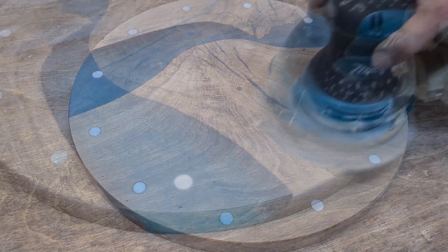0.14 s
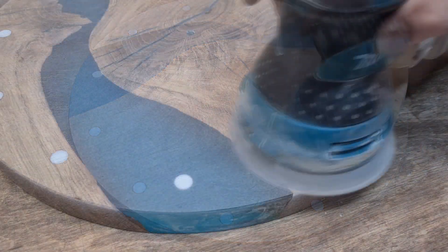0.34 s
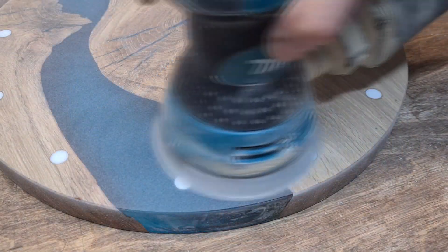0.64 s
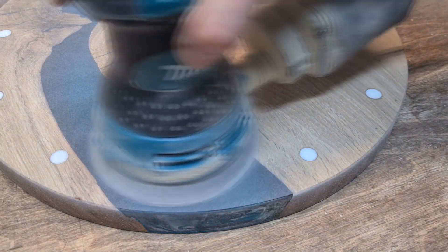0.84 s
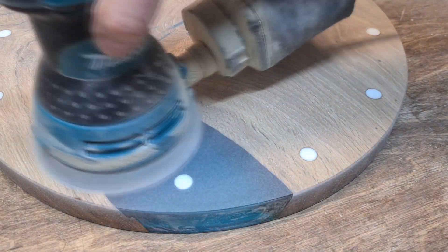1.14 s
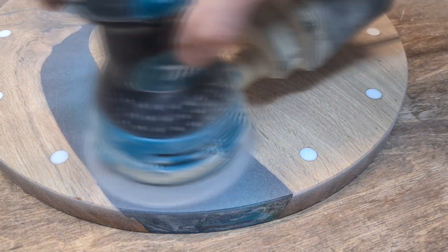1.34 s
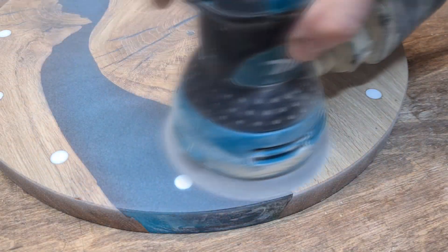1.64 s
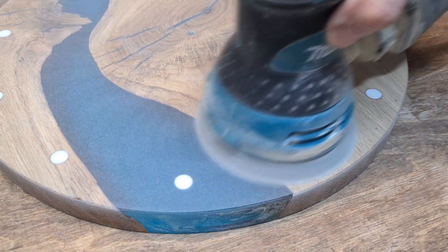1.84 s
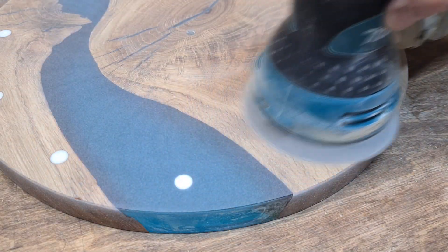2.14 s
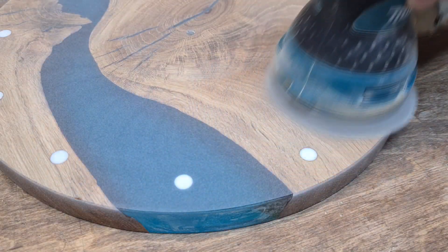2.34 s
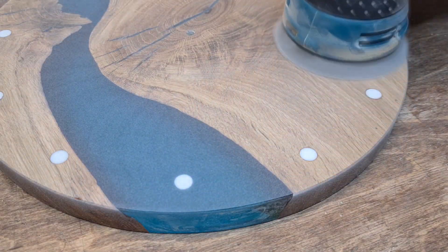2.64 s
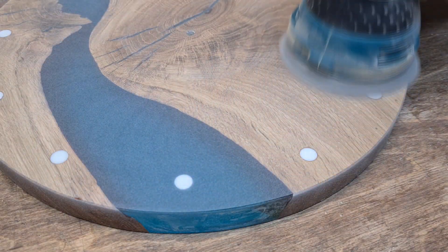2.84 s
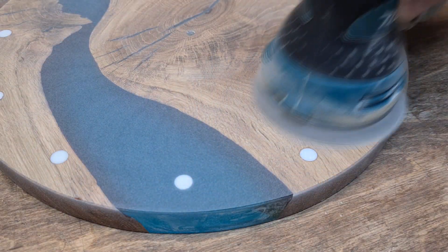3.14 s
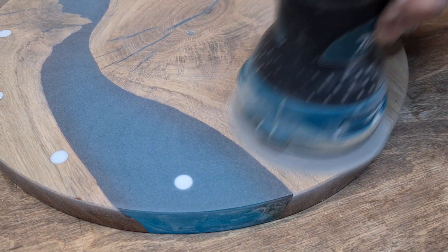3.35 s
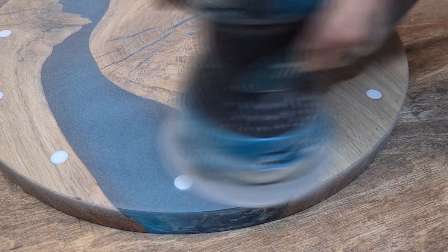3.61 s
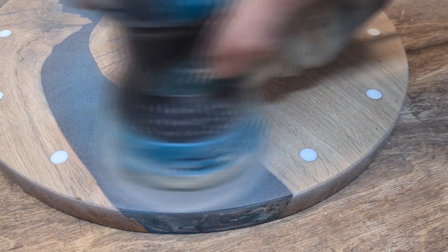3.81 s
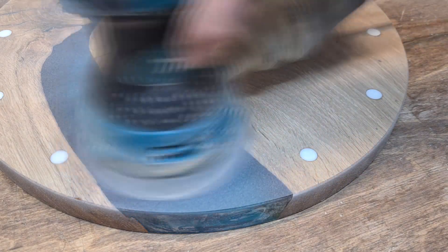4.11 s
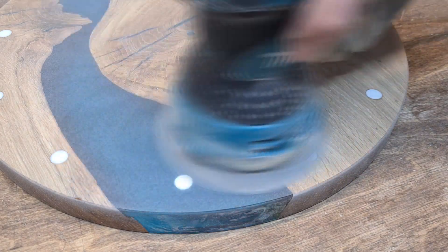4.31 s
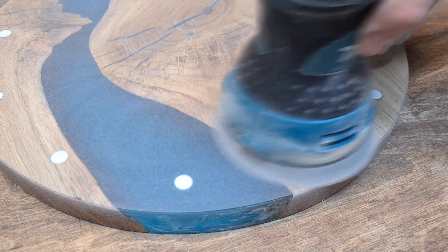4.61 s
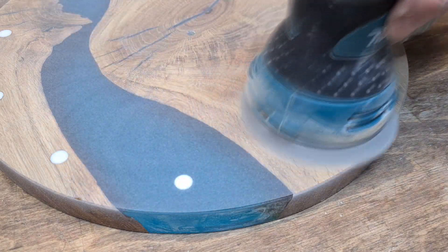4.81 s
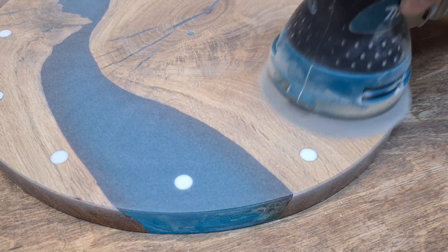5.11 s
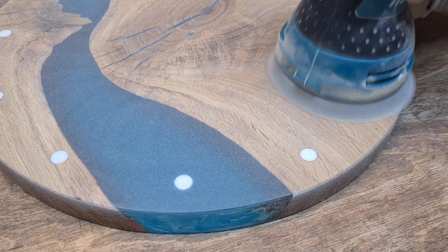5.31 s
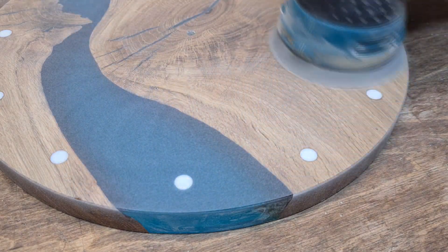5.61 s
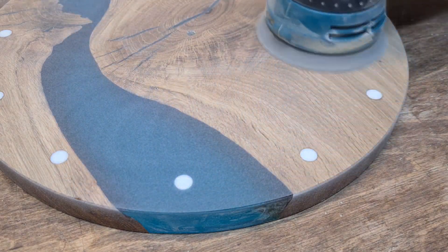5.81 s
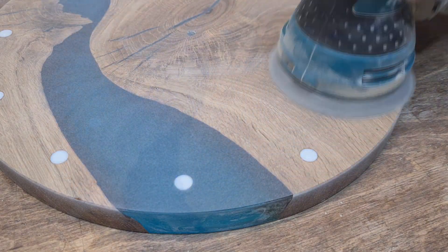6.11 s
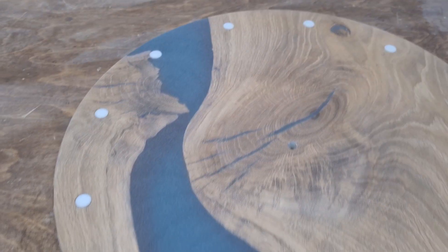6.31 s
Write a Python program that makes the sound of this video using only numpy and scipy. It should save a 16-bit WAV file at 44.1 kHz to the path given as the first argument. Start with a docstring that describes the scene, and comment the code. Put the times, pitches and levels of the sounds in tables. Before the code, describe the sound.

Already running at the start, an electric sander hums, buzzes and whines very close by, its sound leaning right. A second, slightly lower motor tone dies away in the first half second. Dry abrasive rasp and airy hiss stay constant while the whine flickers with each sweep over the board. Over the last second the tool smoothly fades to a barely audible low workshop rumble.

```python
"""A random orbital sander sweeps over a thick wood and resin board in a workshop, near a stereo microphone.
At the start a second, slower sander, a few steady tones, dies away while the near tool's tones come to full level.
Then the shaft orders sing as tones set by the tool's place, the slowly spinning pad adds lines around them,
and shaped noise makes board rumble, casing rattle, grit and air hiss while the tool moves from side to side.
At the end the tool fades out and a faint room rumble of low noise remains."""
import sys
import numpy as np
from scipy import signal
from scipy.fft import rfft, irfft, next_fast_len
from scipy.io import wavfile
from scipy.ndimage import uniform_filter1d, map_coordinates

SR = 44100
rng = np.random.default_rng(int(sys.argv[2]) if len(sys.argv) > 2 else 0)


def generate_wav(signal):
    """Clip the signal to [-1, 1] and save it as 16-bit WAV at the path in sys.argv[1]."""
    frames = np.transpose(np.atleast_2d(signal))
    scaled = np.clip(frames, -1, 1) * 32767
    pcm = np.round(scaled).astype(np.int16)
    wavfile.write(sys.argv[1], SR, pcm)


N = 284886
T = np.arange(N) / SR
COARSE = T[::128]  # time grid of slow changes, s

# shaft speed: time_s, turns_per_s
SHAFT_SPEED = [(0, 202.27), (.4, 202.42), (1.2, 202.98), (1.4, 202.62), (1.8, 201.5), (2.4, 200.26),
               (2.8, 200.76), (3.0, 200.9), (3.35, 200.88), (3.7, 201.43), (4.03, 202.35), (4.2, 202.26),
               (4.4, 201.54), (5.0, 200.35), (5.6, 198.96), (5.8, 199.61), (6.0, 199.82)]
# likeness of the two sides: freq_hz, likeness (0 to 1)
LIKENESS = [(30, .25), (90, .35), (150, 0.53), (300, 0.73), (700, 0.89), (1200, .6), (2500, 0.31),
            (5000, 0.17), (9000, 0.18), (15000, 0.15)]
# arrival difference: place (-1 to 1), left_lag_ms
LEFT_LAG = [(-1, 0.11), (-.6, .09), (-0.27, -.03), (0, -.22), (.3, -0.018), (0.56, 0.043), (0.98, 0.085)]


def amp(db):
    """Amplitude ratio of a level in dB."""
    return 10 ** (np.asarray(db) / 20)


def unit(x):
    """Scale to rms 1."""
    return x / np.sqrt(np.mean(x ** 2) + 1e-20)


def along(points, hz):
    """Interpolate (freq_hz, value) points on a log frequency axis."""
    f, v = np.transpose(points)
    return np.interp(np.log(hz + 1), np.log(f + 1), v)


def curves(rows, t=T):
    """Interpolate each column after the first at t."""
    start, *cols = np.transpose(rows)
    return np.array([np.interp(t, start, c) for c in cols])


def place(t):
    """Place on the lap: -1 far right corner, 0 near left end, 1 back in the corner."""
    # hand path: time_s, unwrapped_place (2 more each lap)
    hand_path = [(0, -.62), (.3, -.42), (.7, -.2), (1.12, 0), (1.5, .28), (1.88, .5), (2.1, .64),
                 (2.28, .73), (2.52, .86), (2.76, 1), (3.0, 1.22), (3.3, 1.4), (3.6, 1.7), (4.0, 2),
                 (4.2, 2.28), (4.5, 2.49), (4.8, 2.67), (4.95, 2.74), (5.4, 2.8), (5.62, 2.86), (5.86, 3),
                 (6.1, 3.2)]
    return (curves(hand_path, t)[0] + 1) % 2 - 1


def wobble(knots_per_s, count):
    """Smooth random curves on the coarse grid: splines through normal random knots."""
    knots = rng.standard_normal((count, 400))
    return np.array([map_coordinates(k, [COARSE * knots_per_s]) for k in knots])


def filtered(x, response):
    """Multiply the spectrum by a response of frequency."""
    m = next_fast_len(N + 8192)
    return irfft(rfft(x, m) * response(np.fft.rfftfreq(m, 1 / SR)), m)[..., :N]


def rush(spectrum, lo_hz, hi_hz, patchy_db, size=512):
    """Patchy stereo noise, mono rms 1 in lo-hi: a shared part with a side-to-side lag plus each side's own part."""
    hz, t, (shared, left, right) = signal.stft(rng.standard_normal((3, N)), SR, nperseg=size)
    field = uniform_filter1d(rng.standard_normal(left.shape), size=7, axis=0)
    field = uniform_filter1d(field, size=8192 // size, axis=1)
    alike = along(LIKENESS, hz)[:, None]
    lag_s = curves(LEFT_LAG, place(t))[0] / 1000
    late = np.exp(-2j * np.pi * np.outer(hz, lag_s))
    z = np.sqrt(alike) * np.array([shared * late, shared])
    z = z + np.sqrt(1 - alike) * np.array([left, right])
    z = z * amp(along(spectrum, hz)[:, None] + patchy_db * unit(field))
    power = np.mean(np.abs(z.mean(0)) ** 2, axis=1)
    band_power = power[(hz > lo_hz) & (hz < hi_hz)].sum()
    pair = signal.istft(z, nperseg=size)[1][:, :N]
    return pair / np.std(pair.mean(0)) * np.sqrt(power.sum() / band_power)


def strong_orders(shaft):
    """Shaft-locked tones: level and phase follow the tool's place, and each side wavers on its own."""
    # all order tables: place, left_db, right_db, left_lead_rad
    # once a turn: the off-centre weight shakes the board
    orbit = [(-1.04, -31, -22.5, -1.3), (-.87, -34.5, -26, -1.4), (-.75, -30, -23, -0.58),
             (-.6, -28, -23, -0.71), (-0.32, -22, -19, -.6), (0, -19.5, -20, -0.29),
             (.3, -23.2, -21.5, -0.63), (.5, -27.2, -23.5, -.85), (.72, -28.5, -25, -1.1),
             (0.783, -31.5, -27, -1.2), (.87, -27, -23.5, -.9), (1, -30.5, -26.5, -1.5)]
    # 2, 3 and 6 a turn
    double = [(-1.04, -25.5, -25, 0), (-0.77, -29, -30.5, 0.2), (-.6, -30.5, -34.2, 1),
              (-.4, -40.5, -36.5, 1.15), (-0.21, -43.5, -36.5, .2), (-0.045, -53.5, -37.5, -0.5),
              (0.18, -46, -38, -4), (.5, -37.5, -35.5, -4.5), (.72, -28, -32.5, -5.5),
              (0.795, -26, -27, -6.5), (.87, -28.5, -30.5, -6), (1, -24.5, -25, -6)]
    triple = [(-0.79, -41, -40, -.4), (-0.8, -52, -50, -.8), (-.4, -39.5, -44, -0.033),
              (-0.25, -41, -48, 1.2), (0, -34.5, -38.5, 1.3), (.3, -38, -43, 1.5), (.5, -45, -41.5, .5),
              (0.75, -42.5, -43, -.9), (.86, -37, -37, -.7), (1, -39, -41, -0.21)]
    sixth = [(-1, -51.5, -56.5, 0), (-0.41, -46, -46.5, .1), (-.15, -57.5, -54, .6), (0.24, -47, -41.5, .6),
             (0.14, -42, -42, .2), (.7, -43, -48.5, 0), (1, -63, -54.5, 0)]
    # 12 a turn: armature slots
    slots = [(-1, -47, -43.5, -0.8), (0.055, -48, -43, -0.8), (-0.47, -47, -47, .3),
             (-0.076, -50.5, -54, 3), (.3, -41.5, -50, 2), (.5, -46, -43.5, -1), (.75, -51, -46, -0.6),
             (1, -49, -45, -0.8)]
    # 18 a turn: fan blades
    fan = [(-1, -47, -36, 2.2), (-.75, -46, -36, 4), (-0.37, -48.5, -37.5, 3.5), (-0.21, -48, -37.5, 7),
           (-0.035, -50.5, -42.5, 3.5), (0.31, -43, -36.5, 1.7), (.5, -46, -35, 0.8), (.75, -49, -38, -4),
           (1, -43, -36, -4.5)]
    # 24 a turn: commutator bars; below is one turn under
    whine = [(-0.86, -38.5, -27.5, 3.7), (-.75, -38.5, -27.5, 3.5), (-.58, -34, -23.5, 3.84),
             (-.3, -37, -30.5, 5), (-.12, -39.5, -34.5, 4.3), (-0.021, -32.5, -36, 6.4),
             (.12, -35.5, -37.5, 9), (0.32, -41.5, -31, 6.9), (.5, -35, -27, 5.8), (.62, -35, -26, 3.26),
             (.8, -36, -26, 2.8), (1, -38, -28.5, 2.6)]
    below = [(-1, -51, -50, -3.3), (-1.1, -47.5, -42, -2.5), (-0.41, -54, -41, -2), (0, -49.5, -48.5, -2.5),
             (.4, -56, -45, -1.3), (.7, -44.5, -37, -2.5), (1, -52.5, -48, -5)]
    # octave of the whine; under is one turn under it
    octave = [(-1.2, -42, -41, -4), (-.7, -46, -40.5, -4), (-0.76, -51.5, -41.5, 0.5),
              (0.085, -45, -43, 1.3), (.1, -37, -39.5, .5), (0.38, -49, -39, 2.5), (.7, -47, -44, 1),
              (1, -45, -34.5, 1.5)]
    under = [(-1, -52, -41.5, 0), (-0.52, -55, -46, 0), (-.4, -62, -58, 0), (0.076, -56, -50.5, 0),
             (.3, -62, -58, 0), (0.81, -55, -47, 0), (1, -52, -42.5, 0)]
    # random waver by tone: share (0 to 1), knots_per_s
    wavering = {"orbit": (.03, 8), "double": (.07, 8), "triple": (.31, 9), "sixth": (.45, 7),
                "slots": (.35, 5), "fan": (.2, 8), "below": (.35, 5), "whine": (.11, 10), "under": (.4, 8),
                "octave": (.3, 13)}
    # brief dips by tone: centre_s, half_length_s (to 1/e of the dB depth), left_depth_db, right_depth_db
    dips = {"orbit": [(2.74, 0.068, 6.5, 7), (5.87, 0.045, 3, 4.5)], "triple": [(1.2, 0.089, -0.5, 8),
            (5.0, .2, 1.5, 5)], "sixth": [(1.6, 0.078, 11, 12), (2.42, .1, 13, 11), (3.95, .1, 8, 4),
            (5.7, .15, 14, 12)], "whine": [(.03, 0.074, 8, 5), (.41, 0.088, 3, 21), (.74, 0.062, 14, 11),
            (.95, 0.017, 5, 18), (1.31, .025, 1, 10), (1.44, 0.048, 17, 12), (1.78, .06, 3, 3.5),
            (1.96, 0.059, 18, 10), (2.21, 0.028, 3, 9), (2.44, 0.047, 22, 17), (2.58, 0.036, 14, 21),
            (2.9, .03, 5, 14), (2.98, .05, 5, 3.5), (3.65, 0.023, 9, 6), (3.86, 0.036, 11, 2),
            (3.92, .04, 3, 16), (4.17, .04, 9, 4), (4.38, 0.092, 1.5, 3), (5.24, 0.055, 8, 4),
            (5.3, 0.044, 20, 17), (5.42, 0.02, 14, 20), (5.62, 0.095, 7, 4.5), (5.81, .025, 3, 14),
            (5.91, 0.018, 18, 11), (6.11, .05, 14, 14)], "fan": [(.08, 0.043, 12, 15), (.44, .03, 6, 7),
            (.91, .04, 8, 15), (1.17, .06, 13, 7), (2.06, .035, 17, 19), (2.17, 0.046, 6, 12),
            (2.34, .04, 9, 19), (2.53, 0.041, 5, 15.5), (2.85, 0.075, 14, 21), (3.2, .04, 10, 15),
            (3.33, .03, 7, 6), (3.65, 0.067, 10, 9), (3.9, 0.077, 9, 13), (4.51, 0.082, 10, 3.5),
            (4.72, 0.057, 17, 9), (4.91, 0.044, 16, 22), (5.06, 0.087, 2, 10), (5.36, .04, 13, 10),
            (5.58, .05, 1, 10), (5.68, 0.054, 15, 19)], "octave": [(.07, .03, 14, 15), (.29, .07, 20, 11),
            (.48, .025, 1, 8), (.99, .03, 17, 17), (1.14, .06, 7, 7), (1.43, .07, 9, 12), (1.9, .03, 1, 9),
            (2.11, .07, 22, 18), (2.32, .035, 17, 15), (2.52, .04, 5, 7.5), (2.76, .04, 5, 16),
            (2.97, .05, 1, 6), (3.4, .13, 11, 14), (4.2, 0.18, 8, 3), (4.45, .04, 10, 17),
            (4.75, .07, 7, 11), (5.07, .04, 15, 5), (5.13, 0.019, 3, 14), (5.45, .06, 4, 12),
            (5.85, .03, 14, 9)]}
    orders = {"orbit": (1, orbit), "double": (2, double), "triple": (3, triple), "sixth": (6, sixth),
              "slots": (12, slots), "fan": (18, fan), "below": (23, below), "whine": (24, whine),
              "under": (47, under), "octave": (48, octave)}
    out = np.zeros((2, N))
    for name, (order, rows) in orders.items():
        left_db, right_db, lead_rad = curves(rows, place(COARSE))
        share, knots_per_s = wavering[name]
        a, b, c, d = wobble(knots_per_s, count=4)
        drift = np.array([a + 1j * b, c + 1j * d]) / np.sqrt(2)
        waver = np.sqrt(1 - share ** 2) + share * drift
        dip_db = sum(np.outer(depth_db, np.exp(-((COARSE - centre_s) / half_s) ** 2))
                     for centre_s, half_s, *depth_db in dips.get(name, []))
        lead = np.array([np.exp(1j * lead_rad), np.ones(len(lead_rad))])
        gain = amp(np.array([left_db, right_db]) - dip_db) * waver * lead
        tone = np.exp(1j * order * shaft)
        out += [(np.interp(T, COARSE, g) * tone).real for g in gain]
    return np.sqrt(2) * out


def weak_orders(shaft, pad):
    """Pad spin shifts lines off the shaft orders; weak lines fade at random, partly alike on both sides."""
    # steady lines: shaft_order, pad_order (subtracted), level_db
    beats = [(1, 1, -42.5), (1, 2, -49.5), (1, -1, -61), (2, 1, -56.5), (2, 2, -54.5), (2, 3, -55),
             (2, -1, -57)]
    # fading lines: shaft_order, pad_order (subtracted), left_db, right_db, knots_per_s
    faint = [(3, .5, -51, -52.5, 16), (3, 2, -44.5, -42.5, 14), (4, 0, -44.5, -46, 7),
             (4, 3, -43.5, -54, 16), (5, 0, -50, -47.5, 5.4), (5, 3, -44, -48, 18),
             (6, 1.5, -49.5, -42, 14), (6, 5, -46, -46, 18), (7, 0, -51.5, -48, 16),
             (7, 5.5, -58.5, -45, 12), (8, 0, -57.5, -47.5, 5.5), (8, 5.5, -63.5, -54.5, 13),
             (10, 0, -54, -49, 6.8), (11, 0, -60, -56, 4), (12.5, 0, -53, -46, 3), (13, 0, -54, -57, 4),
             (16, 0, -52, -52, 5.4), (17, 0, -48, -45.5, 6), (19, 0, -58, -50.5, 4), (20, 0, -62, -53.5, 3),
             (21, 0, -62, -60, 8), (22, 0, -62, -49, 5), (25, 0, -50, -48, 4), (37, 0, -50, -59, 4),
             (49, 0, -60, -56, 5), (50, 0, -58, -56, 5)]
    steady = sum(np.sqrt(2) * amp(db) * np.cos(order * shaft - spin * pad) for order, spin, db in beats)
    out = steady * np.ones((2, 1))
    lag_s = curves(LEFT_LAG, place(COARSE))[0] / 1000
    for order, spin, left_db, right_db, knots_per_s in faint:
        a, b, c, d = wobble(knots_per_s, count=4)
        hz = order * SHAFT_SPEED[0][1]
        alike = along(LIKENESS, hz)
        right = a + 1j * b  # size and phase drift together
        left = alike * right * np.exp(-2j * np.pi * hz * lag_s)
        left = left + np.sqrt(1 - alike ** 2) * (c + 1j * d)
        tone = np.exp(1j * (order * shaft - spin * pad))
        out[0] += (np.interp(T, COARSE, amp(left_db) * left) * tone).real
        out[1] += (np.interp(T, COARSE, amp(right_db) * right) * tone).real
    return out


def sanding(shaft):
    """Shaped noise: board rumble, casing rattle, grit on wood, hollow hiss under the pad, air through the dust holes."""
    # work noise: place, rumble_db, rattle_db, rasp_db, left_minus_right_db (scaled per layer)
    work = [(-1, -64.5, -39, -42.5, -4), (-0.57, -58.5, -39, -43.5, -3.5), (-0.27, -55.5, -42, -43, -2),
            (0, -59.5, -41.5, -46, -1), (.35, -59, -41, -43.5, -2), (0.76, -61, -40.5, -43, -3.5),
            (1, -66.5, -39.5, -44, -2.5)]
    # hollow hiss: time_s, pitch_hz (sets the low-high blend), level_db (before a 3 dB cut)
    hollow_path = [(0, 6600, -36), (.35, 7200, -37.5), (.75, 6700, -42.5), (.97, 7100, -36),
                   (1.54, 6600, -39.5), (1.94, 7260, -35.5), (2.29, 6790, -42), (3.04, 6750, -39),
                   (3.3, 7220, -34), (3.54, 7150, -35), (3.68, 6700, -41), (3.9, 7000, -37.5),
                   (4.25, 6700, -40), (4.35, 6880, -35.5), (4.55, 7080, -34), (5.1, 6900, -44),
                   (5.3, 7190, -46.5), (5.9, 6900, -36)]
    # air hiss: time_s, level_db
    air_level = [(0.0, -38.5), (0.44, -36.5), (0.54, -39), (1.51, -37), (1.99, -41), (2.11, -34),
                 (2.66, -40), (2.94, -37.5), (3.54, -37), (3.63, -39), (4.31, -37), (4.37, -39.5),
                 (4.81, -35.5), (5.3, -39.5)]
    # noise spectra: freq_hz, relative_db (density)
    rumble_spectrum = [(20, -11.5), (60, -7), (110, 0.5), (150, 1), (230, 10.5), (300, -12)]
    rattle_spectrum = [(25, -31), (100, -34), (160, -4), (250, -5), (320, -9.5), (480, -6), (700, -0.5),
                       (950, -0.5), (1200, 4.5), (1500, -1.5), (2200, -2), (3200, -2), (4500, -8),
                       (6000, -12.5)]
    rasp_spectrum = [(2500, -21), (4000, -1), (5300, -0.3), (6300, -0.8), (7500, -1.5), (8500, -6),
                     (10000, -6), (12000, -33)]
    low_spectrum = [(4500, -28), (5900, -5.5), (6600, -1), (7300, -3.5), (8500, -33.5)]
    high_spectrum = [(5200, -35), (6600, -5), (7300, -1), (7900, -7.5), (9000, -30.5)]
    air_spectrum = [(7000, -26), (9000, -7), (10800, -1), (12000, 3.5), (13500, 3), (15900, 2)]

    rumble_db, rattle_db, rasp_db, pan_db = curves(work, place(T))
    pitch_hz, hollow_db = curves(hollow_path)
    flutter, hiss, rock = (np.interp(T, COARSE, w) for w in wobble(12, count=3))
    turn = np.cos(shaft)  # level ripple once a turn

    rumble = amp(rumble_db + 1.2 * rock) * rush(rumble_spectrum, 40, 150, patchy_db=2.0, size=4096)
    rattle = rush(rattle_spectrum, 1420, 2374, patchy_db=1.46, size=1024)
    rattle = amp(rattle_db + 0.45 * flutter + 0.45 * turn) * rattle
    rasp = amp(rasp_db + 0.44 * hiss) * rush(rasp_spectrum, 5250, 6400, patchy_db=1.7)

    blend_rad = np.clip((pitch_hz - 6600) / 600, 0, 1) * np.pi / 2
    low = rush(low_spectrum, 6000, 8000, patchy_db=0.5)
    high = rush(high_spectrum, 6000, 8800, patchy_db=2.0)
    hollow = amp(hollow_db - 3.0) * (np.cos(blend_rad) * low + np.sin(blend_rad) * high)

    air = rush(air_spectrum, 10500, 16450, patchy_db=2.0)
    air = amp(curves(air_level)[0] + 0.4 * hiss + 0.3 * turn) * air

    side_db = np.array([pan_db, -pan_db]) / 2
    return rumble + rattle * amp(0.3 * side_db) + (rasp + hollow) * amp(0.88 * side_db) + air * amp(2.2 * side_db)


def other_sander():
    """A few orders of a slower shaft; they beat with the near tool while they fade."""
    shaft_hz = 197.5
    # tones: shaft_order, left_db, right_db, start_rad, steepness (multiplies the fade in dB)
    other_orders = [(1, -27, -23, 3.85, 1), (2, -39, -32, 3.5, .8), (18, -47, -41, 1.2, 3),
                    (24, -36, -30, 2.5, 3.5), (48, -55, -43, 1.2, 1.2)]
    # fade: time_s, fade_db (before steepness)
    other_fade = [(0, -2), (.1, -1), (.22, -0.5), (.3, -3), (.42, -2.5), (.52, -17), (.62, -48.5)]
    shaft = 2 * np.pi * shaft_hz * T
    fade_db = curves(other_fade)[0]
    out = np.zeros((2, N))
    for order, left_db, right_db, start_rad, steepness in other_orders:
        level_db = np.add.outer([left_db, right_db], steepness * fade_db)
        out += amp(level_db) * np.cos(order * shaft + start_rad)
    return np.sqrt(2) * out


def room(end_s):
    """Faint low workshop rumble, mostly alike on both sides, rising as the tool falls silent."""
    level_db = -69.5
    # rumble spectrum: freq_hz, relative_db (density)
    room_spectrum = [(15, -58), (25, -28), (42, -12), (65, -8), (76, -10), (86, -22), (118, -18),
                     (237, -36.5), (488, -48), (1110, -50), (12000, -57), (15600, -91), (22000, -120)]
    shared, *own = filtered(rng.standard_normal((3, N)), lambda hz: amp(along(room_spectrum, hz)))
    rise = np.clip((T - end_s + 0.05) / 0.1, 0, 1)
    return amp(level_db) * rise * unit(shared + 0.6 * np.array(own))


def scene():
    """Sum the near tool and the second sander, fade them out and add the room."""
    pad_hz, pad_start_turns = 7.42, -0.72  # free spin of the pad
    entry_gain, entry_s = 0.52, 0.41  # start gain of the near tones, time to full level
    end_s, fade_s = 6.175, 0.85  # silence of the tool, length of its fade
    shaft = 2 * np.pi * np.cumsum(curves(SHAFT_SPEED)[0]) / SR
    pad = 2 * np.pi * (pad_hz * T + pad_start_turns)
    entry = np.clip(entry_gain + (1 - entry_gain) * T / entry_s, 0, 1)
    tones = entry * (strong_orders(shaft) + weak_orders(shaft, pad))
    tools = tones + sanding(shaft) + other_sander()
    return tools * np.clip((end_s - T) / fade_s, 0, 1) + room(end_s)


def record(dry):
    """Band limit: a smooth roll-off over the last 120 Hz, nothing above."""
    top_hz = 15810
    return filtered(dry, lambda hz: np.clip((top_hz - hz) / 120, 0, 1) ** 2)


dry = scene()
out = record(dry)
generate_wav(out)
```